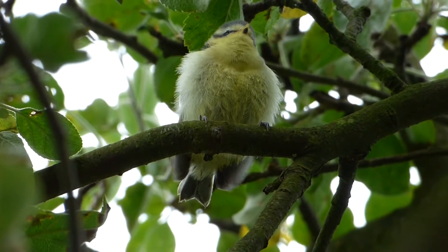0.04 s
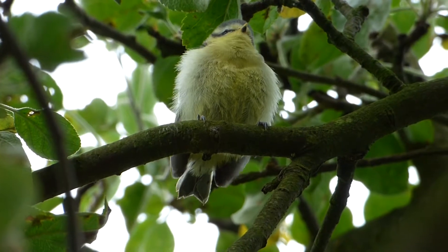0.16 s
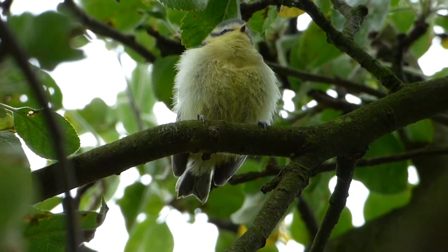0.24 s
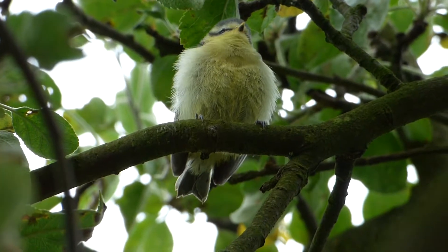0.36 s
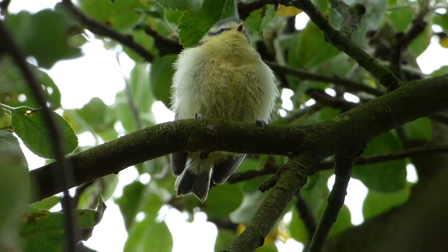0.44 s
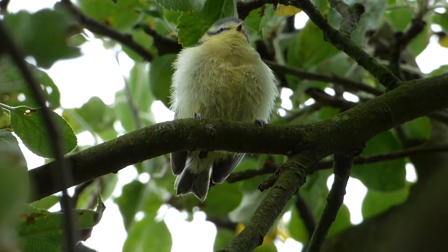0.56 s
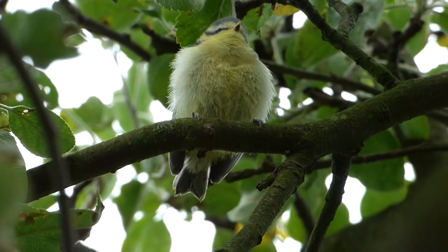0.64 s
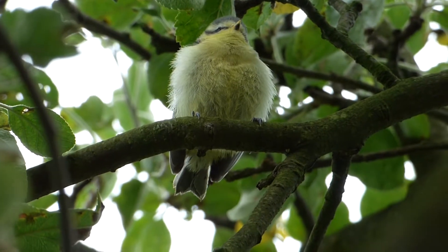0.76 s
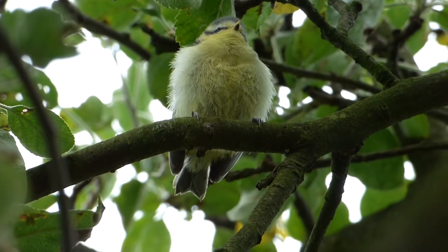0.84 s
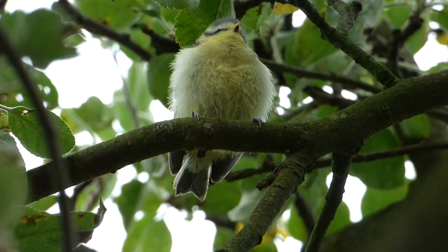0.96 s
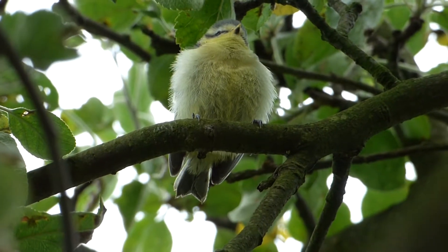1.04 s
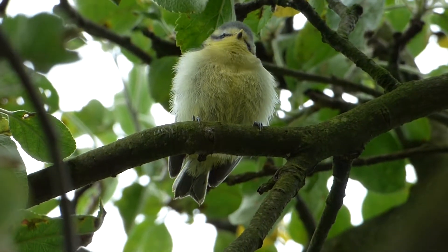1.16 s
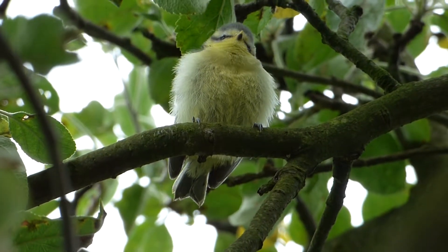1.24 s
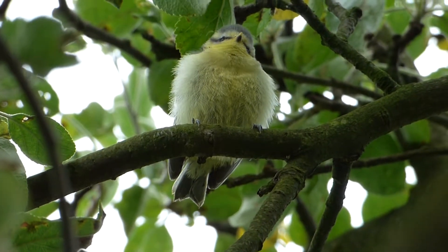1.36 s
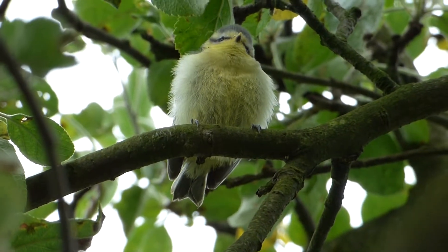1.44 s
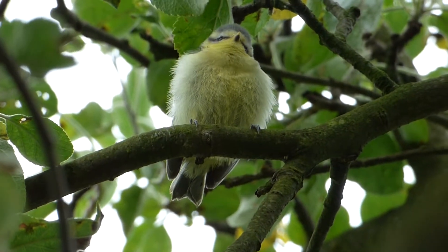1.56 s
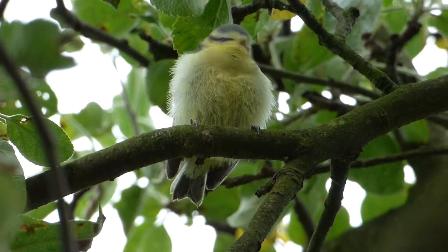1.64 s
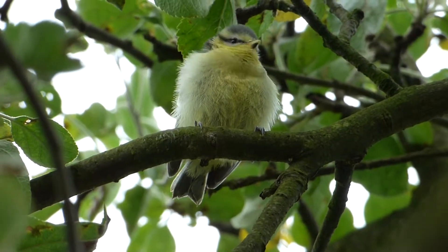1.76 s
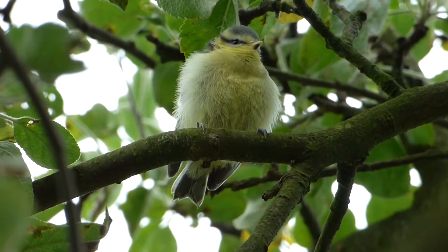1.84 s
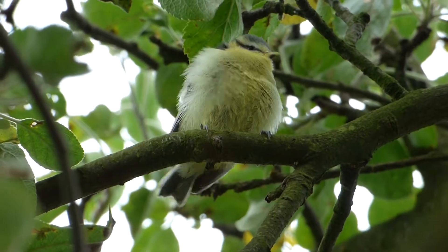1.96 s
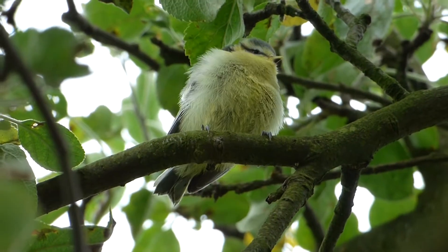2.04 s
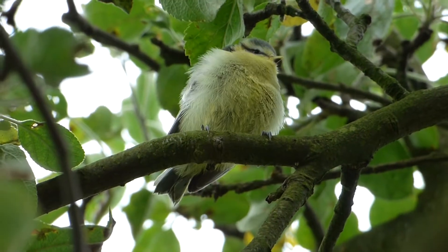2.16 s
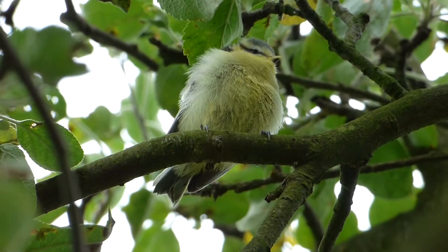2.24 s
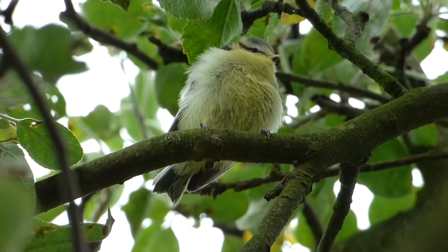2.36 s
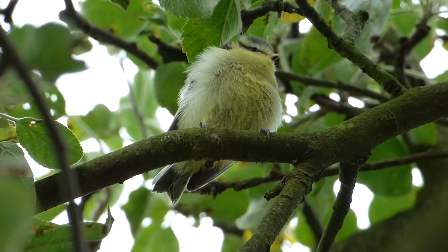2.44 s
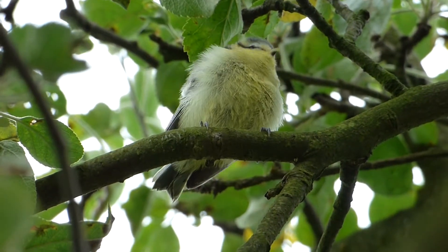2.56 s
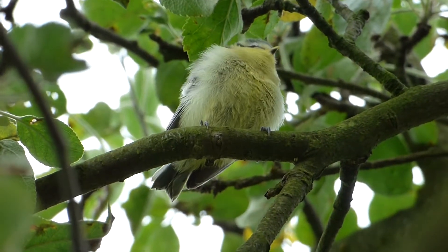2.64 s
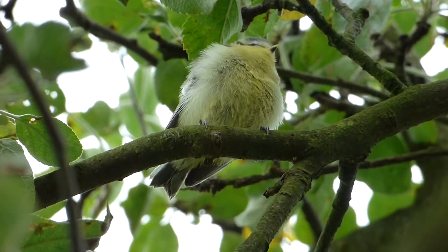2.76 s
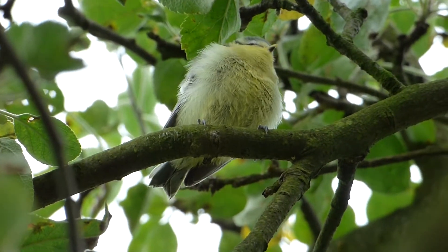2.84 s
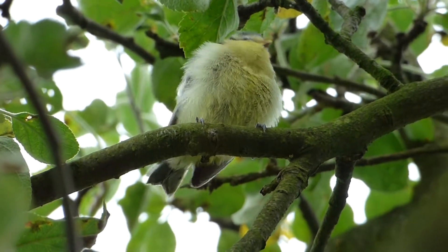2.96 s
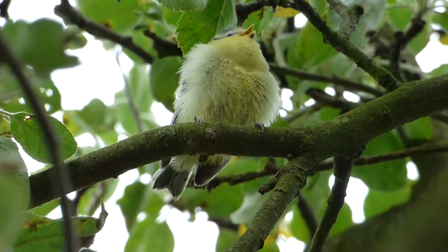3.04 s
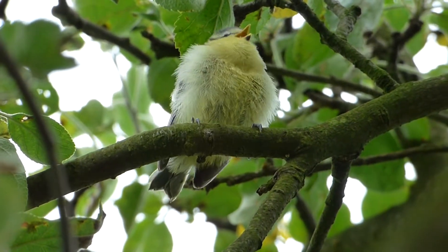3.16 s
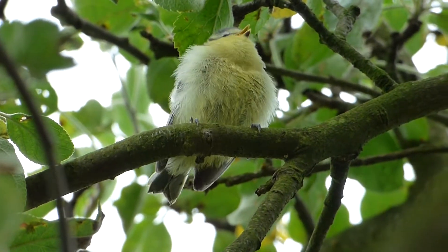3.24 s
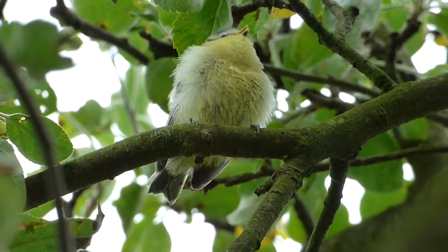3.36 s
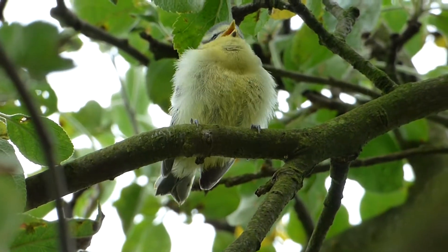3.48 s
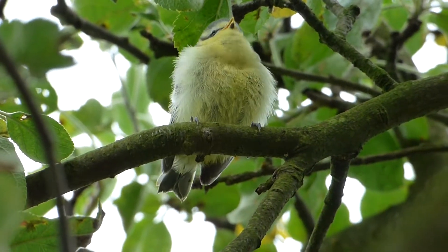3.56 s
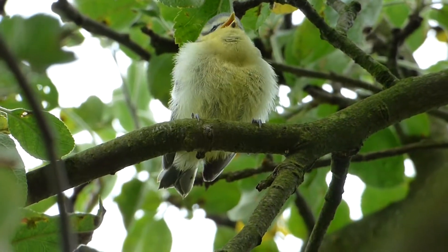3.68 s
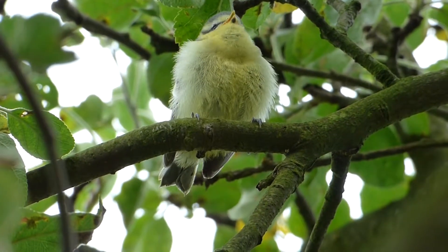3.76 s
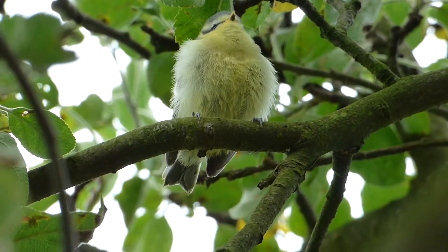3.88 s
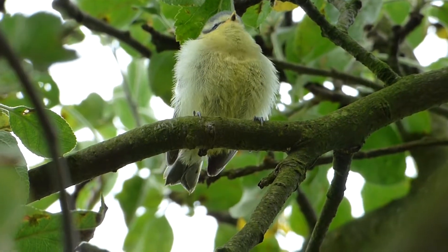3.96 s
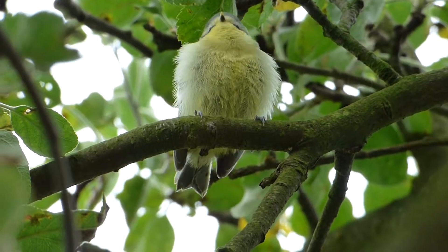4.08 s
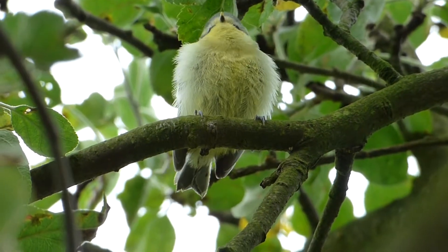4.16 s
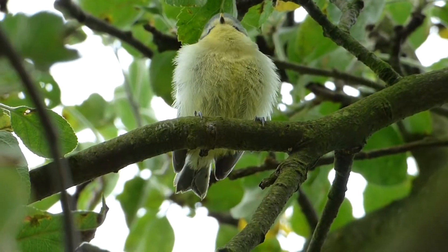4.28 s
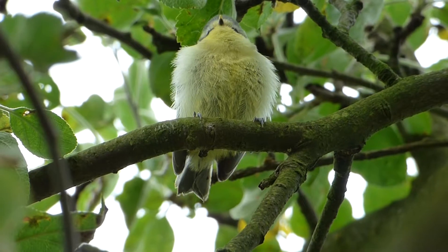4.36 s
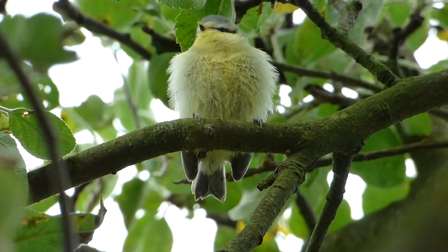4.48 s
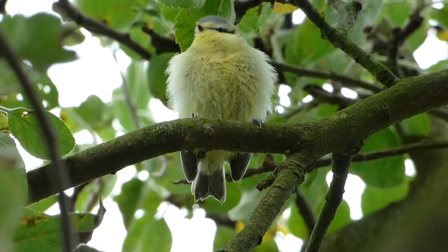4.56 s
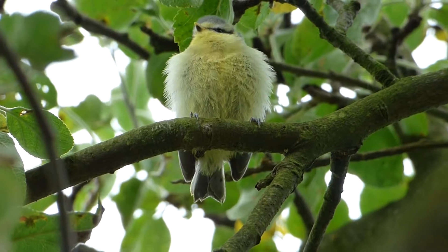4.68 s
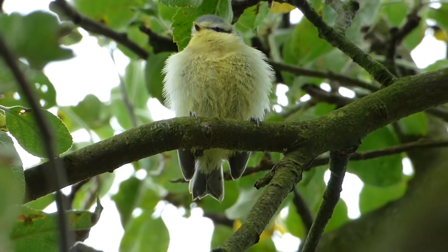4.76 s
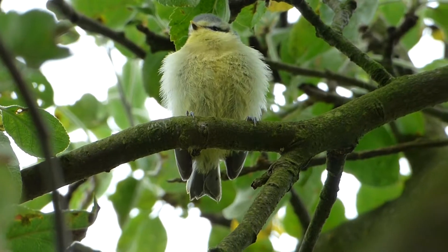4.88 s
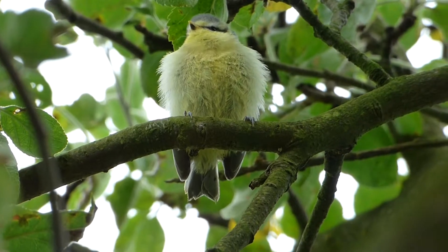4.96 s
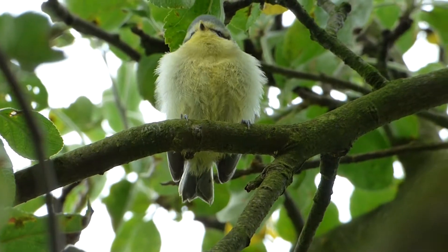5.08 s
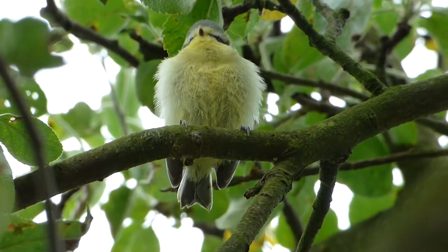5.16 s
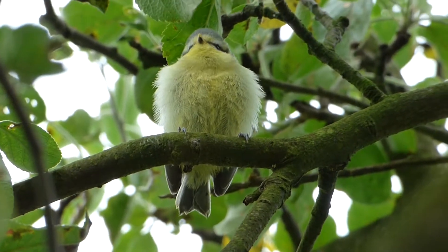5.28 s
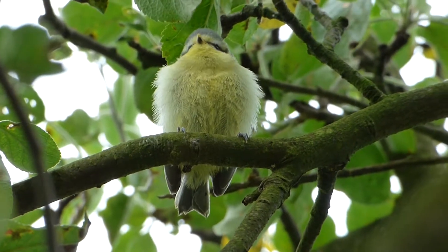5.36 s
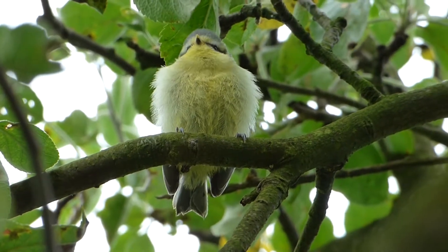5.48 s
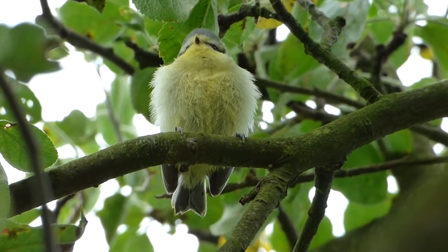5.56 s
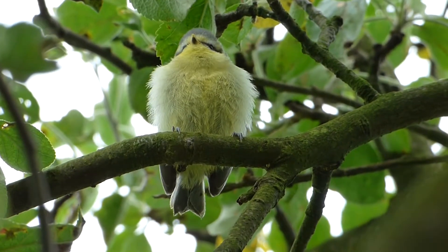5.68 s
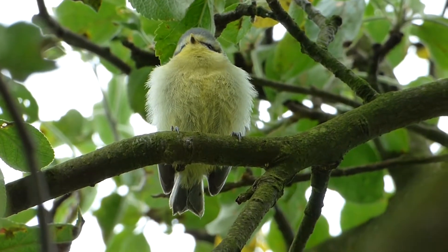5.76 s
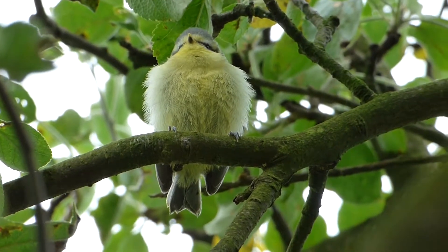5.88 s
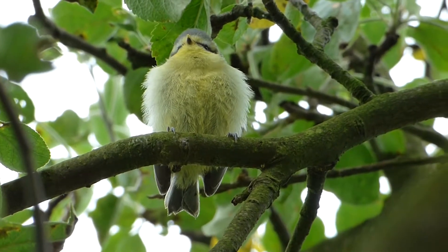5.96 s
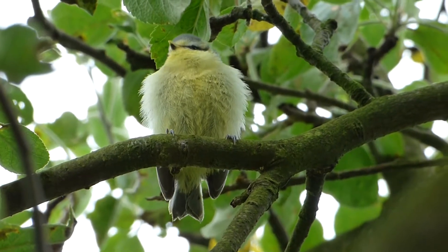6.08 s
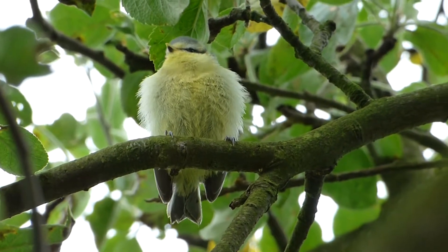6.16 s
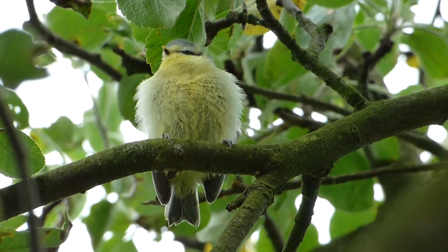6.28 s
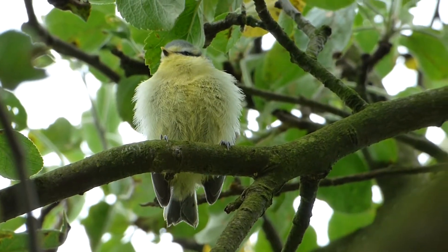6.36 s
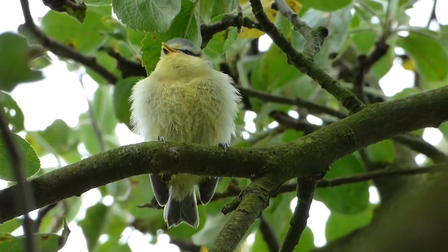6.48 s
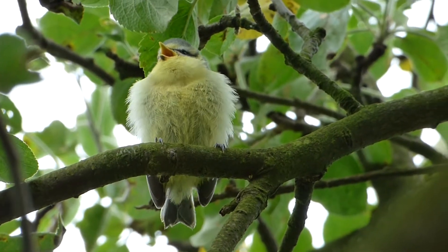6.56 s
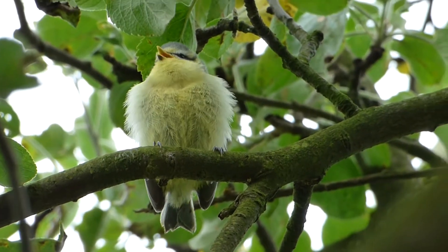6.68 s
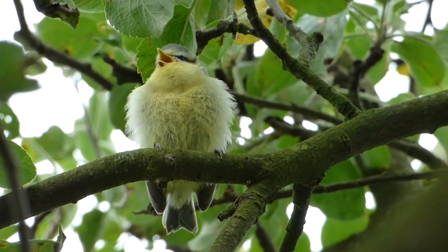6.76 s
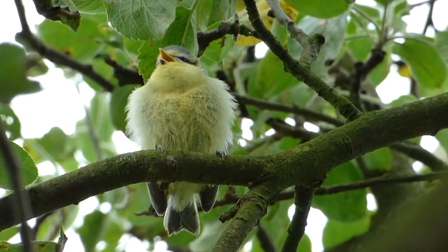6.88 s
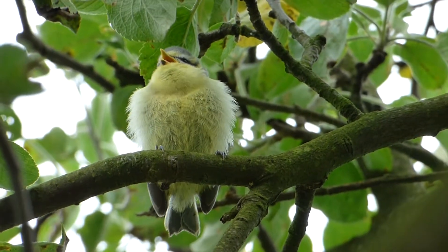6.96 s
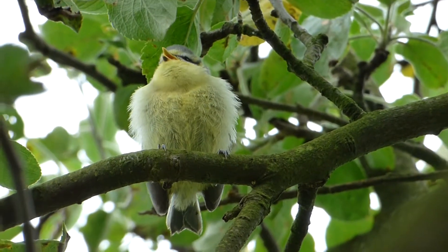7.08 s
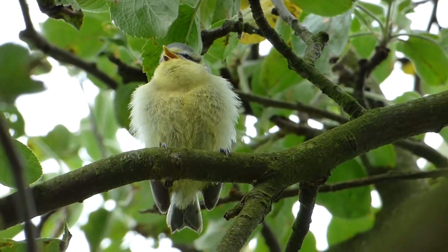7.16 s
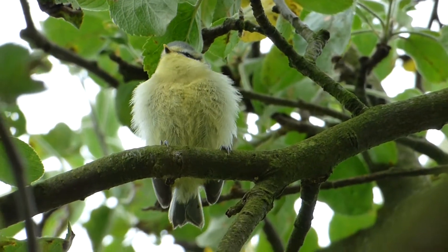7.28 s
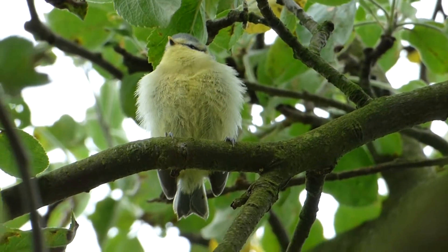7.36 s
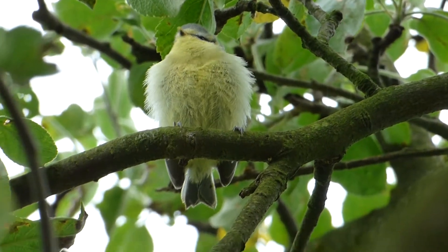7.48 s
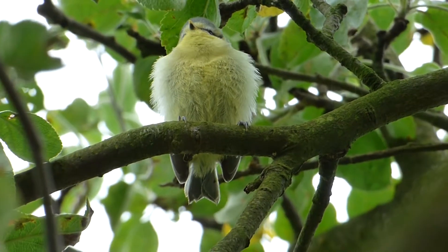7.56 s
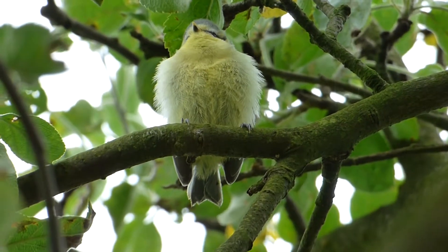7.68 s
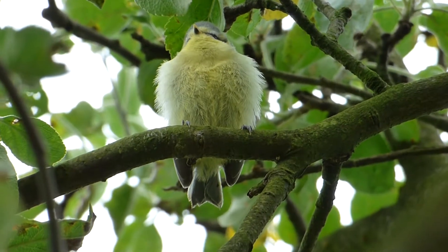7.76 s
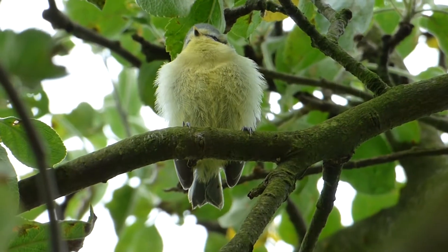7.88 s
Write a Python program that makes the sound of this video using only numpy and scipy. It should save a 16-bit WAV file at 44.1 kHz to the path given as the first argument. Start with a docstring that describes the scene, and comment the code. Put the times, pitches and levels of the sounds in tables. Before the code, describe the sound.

A quiet low rumble and thin hiss run throughout, with barely noticeable brief hums. At 0 s the end of a near fledgling's high, scratchy buzz is heard. From 0.35 to 1.2 s a fainter sibling gives falling chirps and buzzes, blurred by tree echo; another answers at 1.7-2.5 s as a distant bird slides down to a held whistle. A fast two-pitch trill runs faintly from 2.9 to 3.5 s. At 3.1 s the near bird bursts out: three piercing falling chirps around 7 kHz, then two buzzes until 3.85 s. Siblings reply at 3.9-4.3 s and 5.3-6.1 s, with a soft knock at 4.4 s and hoarse rasps near 5.1 s. Quick rising whistles come at 6.0-6.5 s. The near bird begs again from 6.5 to 7.3 s, a tiny squeak before its buzzes. Dry ticks and a dull knock follow around 7.4 s; sibling chirps close.

```python
"""Begging fledgling among trees

A fledgling begs in bursts of chirps and buzzes, and its siblings answer fainter, in a stronger echo. Each side
of the syrinx sings its own pitch; the two mix into extra tones, roughened by breath. Other birds are wavering
sines: whistles, slides and trills, or bands of noise and throbs when hoarse. Noise tails smear the birds like
echoes off trees; noise bursts make dry ticks and dull knocks. Shaped noise lays a low distant rumble and thin
hiss beneath, with brief low hums."""
import sys
import numpy as np
from scipy import signal
from scipy.fft import rfft, irfft, next_fast_len
from scipy.io import wavfile

SR = 44100
rng = np.random.default_rng(int(sys.argv[2]) if len(sys.argv) > 2 else 0)


def wav_out(sig):
    """Save sig, one row per channel (or a flat mono array), as 16-bit PCM at SR to the path in sys.argv[1]."""
    wavfile.write(sys.argv[1], SR, np.round(np.clip(np.atleast_2d(sig).T, -1, 1) * 32767).astype(np.int16))


N = 349713

# near chirps: t/s, length/s, low voice f/Hz, its fall/Hz, peak level/dB, peak at share of length,
# high voice f/Hz, its starting level/dB, its swell/dB
NEAR_CHIRPS = [(3.063, 0.057, 7490, 604, -14, 0.65, 8500, -34.5, -50),
               (3.212, 0.059, 7140, 438, -15, 0.24, 8280, -35, 10),
               (3.357, 0.064, 6965, 750, -17.5, 0.26, 8110, -33, 11),
               (6.48, 0.06, 6880, 327, -27.5, 0.94, 7900, -65, 0),
               (6.63, 0.064, 7060, 764, -18.5, 0.17, 8040, -34, -12),
               (6.787, 0.072, 6870, 880, -21.5, 0.27, 8050, -35.5, 13.5)]
# near buzzes: t/s, length/s, entry f/Hz, held f/Hz, peak level/dB, peak at share of length
NEAR_BUZZES = [(-0.026, 0.12, 6170, 6450, -25.5, 0.54), (3.522, 0.11, 6280, 6550, -22.5, 0.48),
               (3.735, .11, 6170, 6530, -23.5, 0.52), (6.984, 0.088, 6900, 6480, -23, 0.41),
               (7.167, 0.11, 6040, 6490, -25, 0.49)]
# mixing tones of a chirp: times low voice, times high voice
CHIRP_ORDERS = [(-1, 2), (2, -1), (2, 0), (1, 1), (3, -1)]
# one per chirp mixing tone: level/dB against the stronger voice, before fading with the weaker
CHIRP_MIX_DB = [-13.5, -24.5, -37, -26, -23.5]


def fledgling():
    """The near bird, a little to the right: two-voiced chirps and buzzes, and one squeak."""
    out = squeak()
    for row in NEAR_CHIRPS:
        path = chirp(*row, arch_db=24, droop=1.9)
        note = syrinx(path, zip(CHIRP_ORDERS, CHIRP_MIX_DB), rise_s=0.014, scoop=0.3, jitter_hz=25.5,
                      breath_db=-21.5, follow=0.52, puff_db=-20)
        add(out, *note, side_db=-3.0)
    for row in NEAR_BUZZES:
        add(out, *buzz(*row, gap_hz=474, jitter_hz=45.3), side_db=-2.4)
    return out


# squeak that opens one buzz: t/s, length/s, top f/Hz, nominal level/dB, nominal octave level/dB
SQUEAK = (6.942, .042, 5150, -38, -39)


def squeak():
    """An arched pitch and its octave, both roughened by fast random level changes."""
    out = np.zeros((2, N))
    s, length, top_hz, db, octave_db = SQUEAK
    t = np.arange(0, length, 1 / SR)
    hz = top_hz * (1 - (t / length - 0.4) ** 2)
    for multiple, tone_db in ((1, db), (2, octave_db)):
        add(out, whistle(t, multiple * hz, tone_db, blur=drift(900, len(t))), s)
    return out


HIGH_SAG_HZ_PER_S = 15000   # mean fall of the high voice


def chirp(s, length, low_hz, fall_hz, db, peak_share, high_hz, high_db, swell_db, arch_db, droop):
    """Both voices fall as time to the power droop; the low one arches in level, the high one swells or fades."""
    u = np.linspace(0, 1, num=12)
    fall = u ** droop
    low_path = low_hz - fall_hz * fall
    high_path = high_hz - HIGH_SAG_HZ_PER_S * length * fall
    low_level = db - arch_db * (u - peak_share) ** 2   # arch_db is lost one whole length from the peak
    return np.transpose([s + length * u, low_path, high_path, low_level, high_db + swell_db * u])


SETTLE_SHARE, BUZZ_SAG_HZ = 0.192, 288.5   # share of the buzz in which the pitch settles; sag by the end
BUZZ_ARCH_DB = 21   # level lost one whole length away from the peak
# mixing tones of a buzz: times low voice, times high voice
BUZZ_ORDERS = [(-1, 2), (2, -1), (3, -2), (.5, 0), (-.5, 1), (-1.5, 2), (1.5, 0), (.5, 1), (2.5, -1),
               (3.5, -2), (2, 0), (1, 1), (4, -2)]
# one per buzz mixing tone: level/dB against the stronger voice, before fading with the weaker
BUZZ_MIX_DB = [-5.5, -10, -18, -32.5, -22.5, -26.5, -21.5, -29.5, -23, -20.5, -43, -34.5, -42]


def buzz(s, length, entry_hz, held_hz, db, peak_share, gap_hz, jitter_hz):
    """Voices a steady gap apart, with half-pitch tones between; the pitch settles, then sags."""
    u = np.linspace(0, 1, num=12)
    hz = held_hz + (entry_hz - held_hz) * np.exp(-u / SETTLE_SHARE) - BUZZ_SAG_HZ * u ** 2
    level = db - BUZZ_ARCH_DB * (u - peak_share) ** 2
    pair = np.transpose([s + length * u, hz, hz + gap_hz, level, level - 4])
    return syrinx(pair, zip(BUZZ_ORDERS, BUZZ_MIX_DB), rise_s=0.021, scoop=0.049, jitter_hz=jitter_hz,
                  breath_db=-13.5, follow=0.27, puff_db=-38, rasp_db=-20.0, patchy_db=2.0)


PUFF_BAND = signal.butter(1, [5000, 13000], "band", fs=SR, output="sos")
RASP_BAND = signal.butter(3, [4300, 11500], "band", fs=SR, output="sos")


def syrinx(rows, mix, rise_s, scoop, jitter_hz, breath_db, follow, puff_db, rasp_db=-60, patchy_db=0):
    """Two voices and their mixing tones; the pitch scoops up into the note, turbulence blurs every line."""
    s, *columns = np.transpose(rows)
    t = np.arange(s[0] - rise_s, s[-1] + 0.016, 1 / SR)
    low, high, low_db, high_db = [np.interp(t, s, c) for c in columns]
    bend = 1 - scoop * np.clip((s[0] - t) / rise_s, 0, 1) ** 2

    def phase(hz):
        return 2 * np.pi * np.cumsum(hz * bend + jitter_hz * drift(142.0, len(t))) / SR

    def flutter():   # called anew for each tone, so each wavers on its own
        return amp(2 * drift(60, len(t)) + patchy_db * drift(300, len(t)))

    low_turn, high_turn = phase(low), phase(high)
    top_db = np.maximum(low_db, high_db)
    tones = amp(low_db) * flutter() * np.exp(1j * low_turn)
    tones += amp(high_db) * flutter() * np.exp(1j * high_turn)
    for (p, q), db in mix:
        # a mixing tone fades with the weaker voice that feeds it
        loss_db = follow * (abs(p) * (low_db - top_db) + abs(q) * (high_db - top_db))
        heard = p * low + q * high < 0.45 * SR
        # the larger p + q, the hoarser the tone
        wander = np.exp(1j * (p + q) * drift(250, len(t)) / 4)
        turn = np.exp(1j * (p * low_turn + q * high_turn + p * q))
        tones += heard * amp(top_db + db + loss_db) * flutter() * wander * turn
    air = rng.standard_normal(len(t)) + 1j * rng.standard_normal(len(t))
    breath_filter = signal.butter(3, 1100, fs=SR, output="sos")
    breath = amp(breath_db) * rms_one(signal.sosfilt(breath_filter, air))
    # the airway bursts open just before the note
    opening = fades(np.minimum(t, s[0]), rise_s / 2, rise_s / 2)
    puff = amp(top_db[0] + puff_db) * signal.sosfilt(PUFF_BAND, air.real) * opening
    # hiss of air through a tight slit
    hiss = amp(top_db + rasp_db) * signal.sosfilt(RASP_BAND, air.imag)
    note = np.real(tones * (1 + breath) + puff + hiss)
    return np.sqrt(2) * note * fades(t, rise_s, 0.026), t[0]


# sibling chirps: columns as for the near chirps
SIBLING_CHIRPS = [ (0.42, 0.072, 7520, 470, -49, .7, 9260, -58.5, 10),
                  (0.735, 0.08, 6990, 694, -46, 0.11, 8400, -50.5, 6.5),
                  (1.724, 0.079, 7440, 1020, -44, 0.68, 8640, -41, 2.5),
                  (1.906, 0.079, 6860, 597, -41, 0.82, 8110, -39.5, -2.5),
                  (3.904, 0.082, 6420, 810, -41, 0.11, 8140, -46.5, 2),
                  (4.095, 0.076, 6070, 700, -44.5, 0.26, 7560, -44.5, 2.5),
                  (4.273, 0.063, 6570, 605, -40, 0.24, 7770, -43, -5.5),
                  (5.325, 0.063, 7840, 750, -45.5, 0.92, 9600, -66, 12),
                  (5.48, 0.077, 7230, 1030, -47.5, 0.3, 8740, -60.5, 7),
                  (5.634, 0.051, 6860, 360, -51, .55, 8220, -55.5, 5),
                  (7.483, 0.082, 6440, 498, -42, 0.49, 8250, -41, 4.5),
                  (7.662, 0.071, 6280, 477, -39.5, 0.34, 7870, -41.5, 8.5),
                  (7.851, 0.034, 6230, 500, -39, 0.57, 7900, -44, 6),
                  (7.89, 0.04, 6680, 900, -39, .55, 7420, -34.5, -32)]
# chirps of the first sibling that start falling at once: columns as for the near chirps
FALLING_CHIRPS = [(0.35, 0.105, 7700, 2160, -49, 0.2, 8270, -49, -1),
                  (0.565, 0.08, 7430, 845, -44, 0.26, 9200, -57, 12)]
# sibling buzzes: columns as for the near buzzes
SIBLING_BUZZES = [(0.859, 0.079, 6370, 6710, -47, 0.23), (1.045, 0.15, 6130, 6300, -50, 0.35),
                  (2.135, 0.14, 6780, 6310, -43, 0.25), (2.355, 0.12, 6210, 6340, -40, 0.56),
                  (5.71, 0.091, 6680, 6280, -52.5, .45), (5.939, 0.14, 5830, 6580, -54, 0.59)]
# where the siblings sit: t/s, left-right level/dB (positive is left)
SIBLING_SIDE = [(2.0, -1), (4.1, 5.5), (5.5, 2), (7.6, 0.5)]


def siblings():
    """The same two-voiced calls, breathier, from other perches, most of them to the left."""
    out = np.zeros((2, N))
    when, side = np.transpose(SIBLING_SIDE)
    mix_db = np.array(CHIRP_MIX_DB) - 4.5
    for rows, droop in ((SIBLING_CHIRPS, 1.9), (FALLING_CHIRPS, 0.84)):
        for row in rows:
            path = chirp(*row, arch_db=8.5, droop=droop)
            note = syrinx(path, zip(CHIRP_ORDERS, mix_db), rise_s=0.016, scoop=0.12, jitter_hz=35.8,
                          breath_db=-9.5, follow=0.65, puff_db=-40)
            add(out, *note, side_db=np.interp(row[0], when, side))
    for row in SIBLING_BUZZES:
        add(out, *buzz(*row, gap_hz=685, jitter_hz=38.6), side_db=np.interp(row[0], when, side))
    return out


def songbirds():
    """All the clear-voiced birds among the trees, each note a wavering sine."""
    return whistles() + slides() + sweeps() + trills() + pips() + arched_notes()


# whistles to the right: t/s, length/s, start f/Hz, end f/Hz, start level/dB, end level/dB
WHISTLES = [(1.367, 0.049, 3914, 3807, -43.5, -44.5), (1.415, 0.14, 1975, 1920, -60, -65),
            (1.807, 0.14, 3784, 3490, -54.5, -64), (2.242, 0.016, 4990, 3570, -40, -41.5),
            (4.276, .05, 4150, 4200, -57, -63), (4.566, 0.031, 4080, 3110, -50.5, -50),
            (4.666, 0.045, 4620, 4490, -44, -56), (4.916, 0.045, 2655, 2050, -49.5, -58),
            (5.428, 0.083, 3446, 2680, -46, -54), (6.014, 0.095, 3540, 3350, -48, -44.5),
            (6.062, 0.028, 5700, 4420, -38.5, -48), (6.199, 0.025, 4300, 3110, -33, -45.5),
            (6.367, 0.03, 6900, 5500, -46, -41), (7.322, 0.049, 4080, 2780, -50.5, -58)]


def whistles():
    """Single notes gliding straight from one pitch and level to another."""
    out = np.zeros((2, N))
    for s, length, start_hz, end_hz, start_db, end_db in WHISTLES:
        out += glide([s, s + length], [start_hz, end_hz], [start_db, end_db], side_db=-4.5)
    return out


HOLD_SAG_HZ_PER_S = 890
# slides onto a held note, to the right: t/s, slide/s, hold/s, start f/Hz, held f/Hz,
# start level/dB, landing level/dB, end level/dB
SLIDES = [(1.831, 0.22, 0.23, 6800, 4245, -62, -37, -74), (2.368, .16, 0.15, 3850, 2456, -59.5, -56, -52),
          (5.796, 0.041, 0.063, 2580, 2380, -65, -49.5, -51),
          (5.916, 0.0275, 0.11, 3180, 3770, -54, -42, -53),
          (7.558, 0.094, 0.1, 2775, 2386, -73, -54, -55.5)]


def slides():
    """The pitch slides to a held note that sags slowly; the blur clears on landing."""
    out = np.zeros((2, N))
    for s, slide, hold, start_hz, held_hz, *db in SLIDES:
        times = [s, s + slide, s + slide + hold]
        hz = [start_hz, held_hz, held_hz - HOLD_SAG_HZ_PER_S * hold]
        out += glide(times, hz, db, side_db=-5.0, depth=[0.8, LEAF_BLUR, LEAF_BLUR])
    return out


SWEEP_HZ_PER_S, SWEEP_SWELL_DB, SWEEP_SWELL_S = 29800, 19.5, 0.027   # rise of pitch; swell and its time
# rising notes of a bird to the left: t/s, length/s, start f/Hz, full level/dB
SWEEPS = [(6.01, 0.035, 3655, -28.5), (6.126, 0.075, 3246, -32), (6.271, 0.076, 3247, -33),
          (6.417, 0.066, 3197, -34.5)]


def sweeps():
    """A steep steady rise in pitch that swells to full level and stays there."""
    out = np.zeros((2, N))
    for s, length, hz, db in SWEEPS:
        times = np.array([0, SWEEP_SWELL_S, length])
        out += glide(s + times, hz + SWEEP_HZ_PER_S * times, [db - SWEEP_SWELL_DB, db, db],
                     side_db=3.0, depth=0.5)
    return out


TRILL_HOOK_HZ, TRILL_DROP_HZ = 4900, 3650   # pitch where the drop begins and ends
# high trill notes: t/s, length before the drop/s, entry f/Hz, middle f/Hz, level/dB
TRILL_HIGH = [(2.852, 0.027, 4980, 4810, -46.5), (2.902, 0.035, 4950, 4740, -47.5),
              (3, 0.033, 4770, 4950, -42), (3.06, 0.025, 4850, 4970, -43), (3.158, .026, 4770, 5100, -42.5),
              (3.216, 0.021, 4670, 5100, -42), (3.279, 0.028, 4770, 5100, -44.5),
              (3.337, 0.022, 4640, 5090, -37.5), (3.453, 0.026, 4910, 5000, -41)]
# low trill notes: nominal t/s, length/s, level/dB
TRILL_LOW = [(2.903, 0.021, -42.5), (2.961, 0.022, -43), (3.061, 0.017, -35), (3.093, 0.012, -44.5),
             (3.116, 0.017, -33.5), (3.2, 0.01, -38), (3.241, 0.011, -42), (3.267, 0.01, -40),
             (3.324, 0.012, -40.5), (3.364, .015, -43), (3.445, 0.014, -41.5), (3.483, 0.013, -41)]


def trills():
    """A two-pitch trill: high notes that drop at the end among short level low ones."""
    out = np.zeros((2, N))
    for s, length, entry_hz, top_hz, db in TRILL_HIGH:
        t = np.arange(0, length + 0.012, 1 / SR)
        corners = [0, 0.55 * length, length, length + 0.0092]
        hz = np.interp(t, corners, [entry_hz, top_hz, TRILL_HOOK_HZ, TRILL_DROP_HZ])
        add(out, whistle(t, hz, db, rise_s=0.01), s, side_db=0.8)
    for s, length, db in TRILL_LOW:
        t = np.arange(0, length, 1 / SR)
        add(out, whistle(t, 4130, db, rise_s=0.0042), s - 0.003, side_db=-1.0)
    return out


# short falling pips, to the right: t/s, level/dB, nominal octave level/dB
PIPS = [(1.062, -57, -53.5), (1.225, -57, -54.5), (1.709, -57, -49), (5.595, -56, -53.5),
        (5.685, -55.5, -47.5), (6.643, -60, -52), (6.692, -58, -46), (6.739, -55.5, -44.5),
        (6.786, -59, -45)]


def pips():
    """Quick falling notes with a rough octave above."""
    out = np.zeros((2, N))
    t = np.arange(0, 0.022, 1 / SR)
    hz = np.linspace(2700, 1800, len(t))
    for s, db, octave_db in PIPS:
        octave = whistle(t, 2 * hz, octave_db, rise_s=0.0066, blur=drift(500, len(t)) - 0.7)
        add(out, whistle(t, hz, db, rise_s=0.004) + octave, s, side_db=-4.0)
    return out


def arched_notes():
    """A faint, evenly spaced row of notes that rise and fall in pitch."""
    out = np.zeros((2, N))
    t = np.arange(0, 0.03, 1 / SR)
    hz = 2300 + 550 * np.sin(np.pi * t / t[-1])
    for s in 3.85 + 0.088 * np.arange(7):
        add(out, whistle(t, hz, -60, rise_s=0.005), s)
    return out


LEAF_BLUR, LEAF_BLUR_HZ = 0.2, 160   # moving leaves roughen far whistles: usual depth, rate


def glide(s, hz, db, side_db, depth=LEAF_BLUR):
    """A whistle through the given times, pitches and levels, roughened by leaves."""
    out = np.zeros((2, N))
    t = np.arange(s[0] - 0.006, s[-1] + 0.0079, 1 / SR)
    leaves = drift(LEAF_BLUR_HZ, len(t)) + 1j * drift(LEAF_BLUR_HZ, len(t))
    blur = np.interp(t, s, np.broadcast_to(depth, len(s))) * leaves
    add(out, whistle(t, np.interp(t, s, hz), np.interp(t, s, db), blur=blur), t[0], side_db)
    return out


def whistle(t, hz, db, rise_s=0.015, blur=0):
    """A sine with a slightly unsteady pitch; blur widens it into a hoarse band."""
    turn = np.exp(2j * np.pi * np.cumsum(hz + 35 * drift(66.0, len(t))) / SR)
    return np.sqrt(2) * amp(db) * np.real(turn * (1 + blur)) * fades(t, rise_s, rise_s)


def hoarse_birds():
    """Far notes that arrive as bands of noise or throbs."""
    return hoarse_notes() + rasps() + throbs()


HOARSE_WIDTH = 0.0926   # blur rate as a share of the starting pitch
# hoarse notes to the right: t/s, length/s, start f/Hz, end f/Hz, nominal level/dB
HOARSE = [(0.198, 0.17, 4750, 4095, -64.5), (0.512, 0.2, 4880, 4034, -61), (1.63, 0.047, 4850, 4330, -61.5),
          (2.629, 0.086, 3010, 2950, -66.5), (4.375, 0.15, 5220, 5320, -61),
          (4.658, 0.12, 5260, 3110, -63.5), (4.662, .025, 6300, 5620, -71),
          (4.686, 0.131, 2037, 1938, -69.5), (5.628, 0.096, 4330, 3407, -62.5),
          (5.744, 0.16, 6020, 5280, -61.5), (7.612, 0.067, 3890, 3050, -64)]


def hoarse_notes():
    """Random modulation replaces the steady tone with a gliding noise band."""
    out = np.zeros((2, N))
    for s, length, start_hz, end_hz, db in HOARSE:
        t = np.arange(0, length, 1 / SR)
        width_hz = HOARSE_WIDTH * start_hz
        blur = drift(width_hz, len(t)) + 1j * drift(width_hz, len(t)) - 1   # -1 takes the pure tone out
        hz = np.linspace(start_hz, end_hz, len(t))
        add(out, whistle(t, hz, db + 8.0, rise_s=0.0027, blur=blur), s, side_db=-4.0)
    return out


# two-banded rasps: t/s, length/s, nominal level/dB
RASPS = [(5.044, 0.055, -50.5), (5.133, 0.06, -48), (5.222, 0.054, -47), (5.305, 0.063, -47)]


def rasps():
    """Two level pitches, each blurred into a noise band."""
    out = np.zeros((2, N))
    for s, length, db in RASPS:
        t = np.arange(0, length, 1 / SR)
        for hz in (3500, 4200):
            blur = drift(330, len(t)) + 1j * drift(327, len(t)) - 0.3
            add(out, whistle(t, hz, db - 6.0, blur=blur), s)
    return out


THROB_DEPTH = 1   # 0-1
# throbbing notes to the right: t/s, length/s, f/Hz, throbs per s, nominal level/dB
THROBS = [(-0.02, 0.1, 2365, 88, -59.5), (0.197, 0.23, 2290, 91, -63.5), (0.528, 0.223, 2310, 86, -61),
          (6.456, 0.11, 2570, 125, -55)]


def throbs():
    """An unsteady pitch whose level pulses fast."""
    out = np.zeros((2, N))
    for s, length, hz, rate, db in THROBS:
        t = np.arange(0, length, 1 / SR)
        note = whistle(t, hz + 120 * drift(185, len(t)), db, rise_s=0.0038)
        pulse = (1 + THROB_DEPTH * np.sin(2 * np.pi * rate * t)) ** 2 / 2
        add(out, note * pulse, s, side_db=-7.5)
    return out


# dry ticks close by: t/s, nominal level/dB
TICKS = [(7.368, -19), (7.3991, -29), (7.441, -19.5)]


def ticks():
    """Bright puffs of noise that die away within milliseconds."""
    out = np.zeros((2, N))
    bright = signal.butter(3, 8000, "high", fs=SR, output="sos")
    for s, db in TICKS:
        add(out, amp(db - 12) * noise_burst(bright, decay_s=0.0013), s)
    return out


# dull knocks close by: t/s, nominal level/dB
THUMPS = [(4.412, -53.5), (7.464, -50.5)]


def thumps():
    """A low burst of noise rings for a moment with a bright snap on top."""
    out = np.zeros((2, N))
    dull = signal.butter(2, [120, 390], "band", fs=SR, output="sos")
    snap = signal.butter(2, [1000, 7000], "band", fs=SR, output="sos")
    for s, db in THUMPS:
        add(out, amp(db + 31.5) * noise_burst(dull, decay_s=0.015), s)
        add(out, amp(db + 14.5) * noise_burst(snap, decay_s=0.014), s)
    return out


def noise_burst(band, decay_s):
    """Exponentially dying noise through a filter."""
    t = np.arange(0, 0.08, 1 / SR)
    return signal.sosfilt(band, rng.standard_normal(len(t)) * np.exp(-t / decay_s))


def trees(x, echo_db, t60_s, first_s):
    """Trunks and leaves scatter a lumpy fading echo, partly shared by both channels."""
    t = np.arange(0, t60_s, 1 / SR)
    fading = amp(-60 * t / t60_s + 2 * drift(120, len(t))) * (t > first_s)
    shared, left, right = rng.standard_normal((3, len(t))) * fading
    tail = np.array([shared + 0.93 * left, shared + 0.52 * right])
    tail *= amp(echo_db) / np.sqrt(np.sum(tail ** 2) / 2)
    return x + signal.fftconvolve(x, tail, axes=1)[:, :N]


# spectrum of the sum of the channels: f/Hz, relative level/dB per Hz
FLOOR_MID = [(24, -34.5), (40, -14), (198, 4), (378, -1), (497, 0), (705, -4.5), (840, -3), (951, -7),
             (1780, -13), (4040, -10.5), (10700, -23), (15600, -35)]
# spectrum of their difference: f/Hz, relative level/dB per Hz
FLOOR_SIDE = [(24, -52), (40, -41), (359, -12), (622, 2), (1910, -20.5), (4820, -22), (11200, -32.5),
              (15600, -37.5)]


def background():
    """Rumble and hiss as sum and difference of the channels, plus the hums."""
    mid = coloured(FLOOR_MID, level_db=-52.5)
    side = coloured(FLOOR_SIDE, level_db=-53.5)
    return np.array([mid + side, mid - side]) + hums()


# bands that stand out or drop out: f/Hz, width/Hz, level change/dB
FLOOR_BANDS = [(386.6, 6.8, -31), (846.5, 27, 6.5), (1299, 27, 9)]


def coloured(spectrum, level_db):
    """Noise with a set spectrum; its level wanders slowly."""
    size = next_fast_len(N)
    hz = np.arange(size // 2 + 1) * SR / size + 1   # +1 keeps the logarithm finite
    corner_hz, corner_db = np.transpose(spectrum)
    db = np.interp(np.log(hz), np.log(corner_hz), corner_db)
    for centre_hz, width_hz, lift_db in FLOOR_BANDS:
        db += lift_db / (1 + (2 * (hz - centre_hz) / width_hz) ** 2)
    noise = irfft(rfft(rng.standard_normal(size)) * amp(db), size)[:N]
    return rms_one(noise) * amp(level_db + 1.0 * drift(2.86, N))


# low hums that swell up for a moment: t/s, length/s, f/Hz, mean level/dB
HUMS = [(0.72, 0.4, 139.6, -62), (1.5, 0.17, 216.6, -57), (2.56, 0.2, 139, -53), (3.55, 0.525, 144, -62),
        (7.31, 0.43, 140, -58.5)]


def hums():
    """Low sines, unsteady in pitch and level."""
    out = np.zeros((2, N))
    for s, length, hz, db in HUMS:
        t = np.arange(0, length, 1 / SR)
        swell = amp(db + 3.8 * drift(9.5, len(t))) * fades(t, 0.039, 0.018)
        turn = 2 * np.pi * np.cumsum(hz + 4 * drift(17.0, len(t))) / SR
        add(out, np.sqrt(2) * swell * np.sin(turn), s)
    return out


def amp(db):
    """Decibels to amplitude."""
    return 10 ** (np.asarray(db) / 20)


def rms_one(x):
    """Scale to an rms of 1."""
    return x / np.sqrt(np.mean(np.abs(x) ** 2) + 1e-20)


def drift(hz, size):
    """Random wander up to about hz, rms 1: noise through a two-pole low-pass."""
    r = np.exp(-2 * np.pi * hz / SR)
    run_in = int(SR / hz)
    noise = rng.standard_normal(size + run_in)
    return rms_one(signal.lfilter([1], [1, -2 * r, r * r], noise)[run_in:])


def add(out, x, s, side_db=0):
    """Mix a sound into both channels from time s; positive side_db leans left."""
    i = round(s * SR)
    x = x[max(-i, 0):N - i]
    i = max(i, 0)
    out[:, i:i + len(x)] += x * amp([[side_db / 2], [-side_db / 2]])


def fades(t, rise_s, fall_s):
    """Smooth sine-squared fade in and out."""
    ramp = np.minimum((t - t[0]) / rise_s, (t[-1] - t) / fall_s)
    return np.sin(np.pi / 2 * np.clip(ramp, 0, 1)) ** 2


def scene():
    """Each group of birds gets its own echo; knocks and background stay dry."""
    near = trees(fledgling(), echo_db=-16.5, t60_s=0.41, first_s=0.006)
    # leaves soak up the siblings' top
    leaf_filter = signal.butter(1, 12500, fs=SR, output="sos")
    dulled = signal.sosfilt(leaf_filter, siblings())
    kin = trees(dulled, echo_db=-1.5, t60_s=0.35, first_s=0.005)
    far = trees(songbirds() + hoarse_birds(), echo_db=-2.5, t60_s=0.5, first_s=0.0071)
    return near + kin + far + ticks() + thumps() + background()


def record(dry):
    """A steep low-pass cuts the top."""
    return signal.sosfilt(signal.cheby2(22, 50, 15720, fs=SR, output="sos"), dry)


dry = scene()
out = record(dry)
wav_out(out)
```